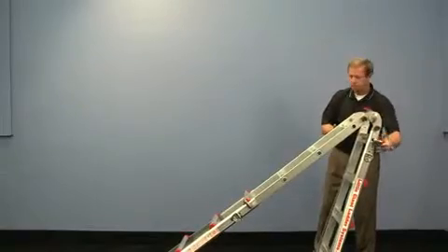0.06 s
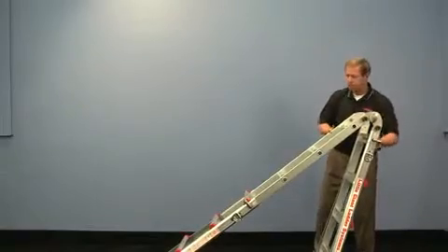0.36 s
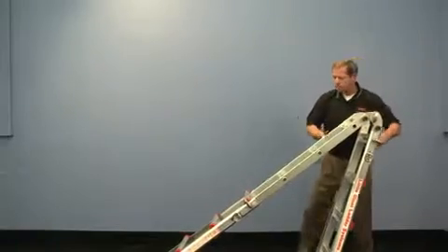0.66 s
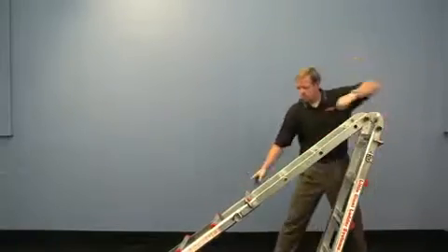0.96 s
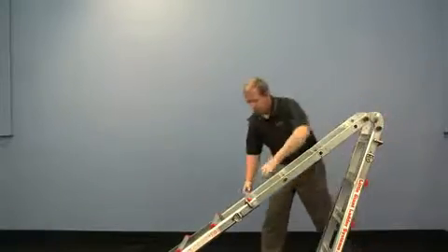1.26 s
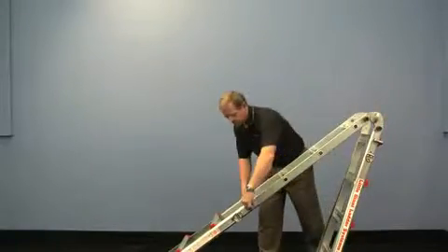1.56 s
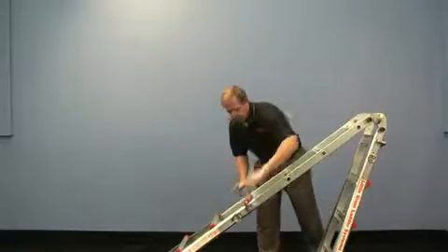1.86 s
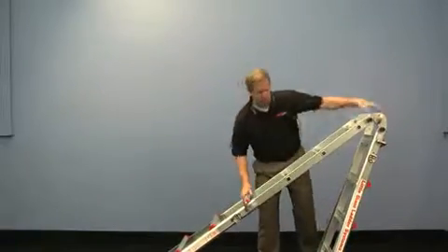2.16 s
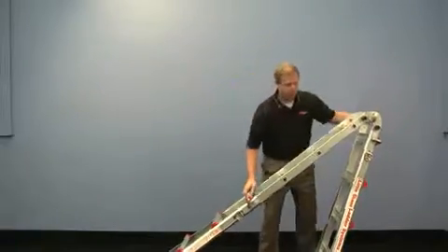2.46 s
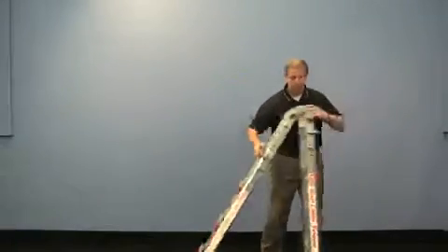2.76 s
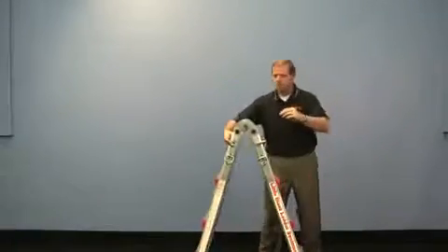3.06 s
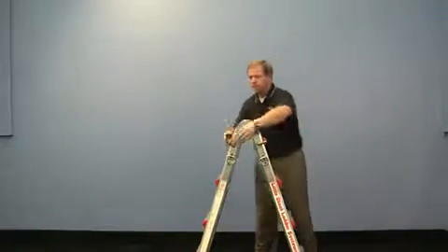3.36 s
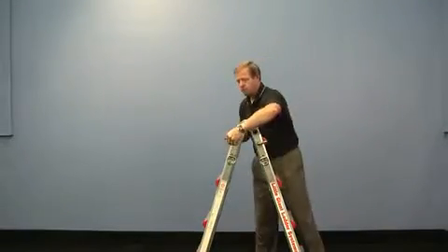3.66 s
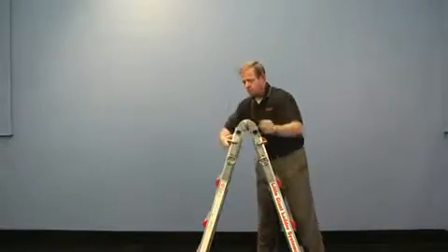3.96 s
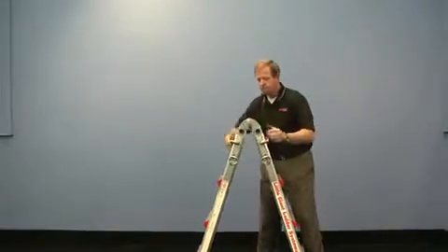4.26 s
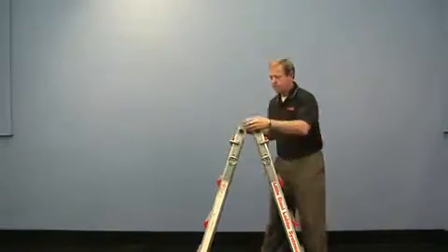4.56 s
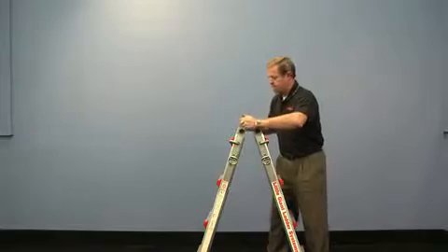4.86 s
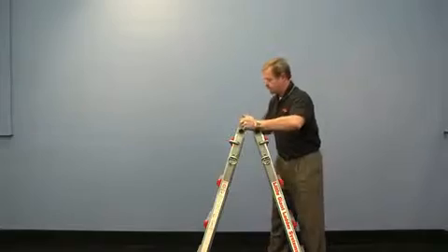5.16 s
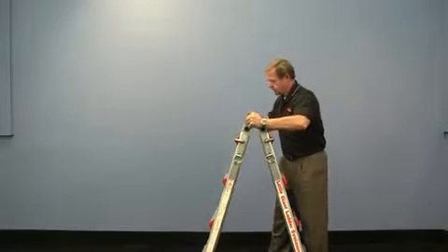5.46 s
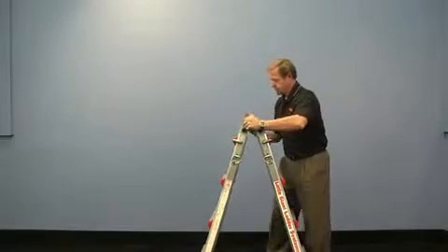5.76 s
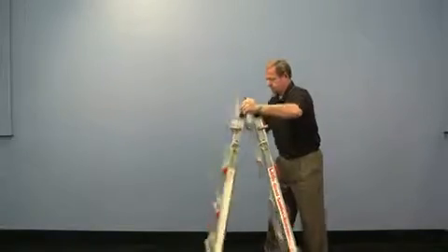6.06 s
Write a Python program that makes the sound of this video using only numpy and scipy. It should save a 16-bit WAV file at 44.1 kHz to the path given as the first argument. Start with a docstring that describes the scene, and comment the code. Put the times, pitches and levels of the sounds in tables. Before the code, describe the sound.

An aluminium folding ladder is unlatched with sharp snaps and ringing clanks. After a soft step, more knocks follow, then the rails scrape and the feet drag briefly as it swings upright. Hard clanks land with a low thump, a pin ticks lightly, and a last clatter locks it. One microphone picks up the bare room's echo and a faint ventilation rumble.

```python
"""Lock pins snap and rails knock together as an aluminium folding ladder is unlatched in a bare studio.
Each blow sets the hollow tubes ringing, shakes loose fittings and echoes round the room. After a soft
step the ladder swings upright: rails scrape, feet drag and the hardest blows carry a deep thump. A pin
ticks as it feels for its hole, and the ladder locks again. Ventilation rumbles faintly throughout.
An automatic gain control ducks under the hardest slams and lets the room swell back."""
import sys
import numpy as np
from scipy import signal
from scipy.fft import rfft, irfft
from scipy.io import wavfile
from scipy.ndimage import uniform_filter1d

SR = 44100
rng = np.random.default_rng(int(sys.argv[2]) if len(sys.argv) > 2 else 0)


def pcm_store(signal):
    """Save signal as 16-bit PCM."""
    levels = np.round(np.clip(np.atleast_2d(signal), -1, 1) * 32767)
    wavfile.write(sys.argv[1], SR, levels.astype(np.int16).T)


N = 274302

# Blows of locks and rails. Shudder is how much a blow shakes the whole frame.
# Columns: start_s, level_db, brightness_db_per_octave, extra_thud_db, shudder_db
BLOWS = [(0.0, -13, 0.5, -3.5, 2), (0.104, -8.5, 2, -3.5, 1), (0.214, 0, 2.2, 0.5, -3.5),
         (0.3297, -5.5, 0, -7.5, -17), (0.362, -14, 2, -11.5, 0), (0.491, -24, -6, 7.5, -2.5),
         (0.572, 4, 0, -2.5, -2.5), (0.7339, -1.5, 0, -8, -4.5), (1.707, -12.5, -1, 7.5, 4),
         (1.735, -3.5, 5.5, 9, -1.5), (1.762, -4, 6, 12, -1.5), (1.8242, -8, -0.5, -1, 4),
         (1.8641, -4.5, 1.5, 5.5, -2), (1.888, -4, 0, -4, -6), (1.9714, -13, 6, 1, -1.5),
         (2.1061, -10.5, 5.5, 8, -4.5), (2.2351, -19, 1, -2, 8), (2.3325, -25, 4.5, -13, -3),
         (2.516, -24.5, 1.5, -10, 8), (2.5516, -18, -0.5, 1.5, 1), (2.605, -6.5, -0.4, 0, -3),
         (2.771, -2.5, 1.4, 9, -4), (2.784, -5, 2, 5.5, 4.5), (2.9742, -15, -1, 1, 4.5),
         (3.1071, -8, 0.5, -24, 1.5), (3.1436, -4, -0.8, -19, -0.5), (3.1754, -6.5, 2, 7, -13),
         (3.197, -8, 1, -4.5, -21), (3.214, -7, -0.5, -18.5, -15), (3.29, 1, 0.5, -32.5, -7.5),
         (3.4514, -23, 5, -8, -10), (3.5453, -17.5, 3, -18, -14), (3.7147, 2, .6, -3, -12),
         (3.7353, -1.5, 0, -6, 0.5), (3.8318, -2.5, -4, -10.5, -5), (4.147, -17, 1, -3.5, 1),
         (4.236, -1, 4.5, 4, -11), (4.246, -0.5, 0.5, -6.5, 4.5), (4.402, 0, .5, -7, -2),
         (4.506, -18.5, -1.4, -2, -5), (4.589, -25.5, 0.5, -2, -17), (4.642, -23.5, -2.5, -11, -7.5),
         (5.284, -26, 1, -4, 3.5), (5.2895, -19.5, 2.5, -3, -9), (5.3896, -22, 0, -8, 8),
         (5.408, -10.5, -0.5, -0.5, 4), (5.419, -6.5, 2.5, 7, -2), (5.431, -8, 0, 3, -1.5),
         (5.459, -6.5, 1.5, 2, -12), (5.4874, -10.5, 0.5, 1, -10), (5.5604, -3, 3.5, 4, -1),
         (5.685, -15, 0, 5.5, 6), (5.7006, -2.5, 3.5, 4.5, -4), (5.852, -6.5, 2.8, -19, -3),
         (5.9889, -3, -1, -5, -3.5), (6.1487, -19, 1.5, 11, -10)]
# The four ranges of a blow's sound (thud, body, clang, top), each given by its centre: pitch_hz
REGISTERS_HZ = [380, 1050, 3300, 9500]
CUTOFF_HZ = 16000


def from_db(db):
    """Turn decibels into a number to multiply a sound by."""
    return 10 ** (np.asarray(db) / 20)


def at_hz(points, hz):
    """Read between the rows of a (pitch_hz, value) table, giving every octave equal room."""
    known_hz, values = np.transpose(points)
    return np.interp(np.log(np.maximum(hz, 1)), np.log(known_hz), values)


def dying(t, ring_s):
    """A fade that falls by 60 dB in ring_s seconds."""
    return np.exp(-np.log(1000) * t / ring_s)


def fading(start_s, attack_s, fade_s):
    """A force that sets in at start_s and dies away."""
    t = np.maximum(np.arange(N) / SR - start_s, 0)
    return np.minimum(t / attack_s, 1) * dying(np.minimum(t, 3 * fade_s), fade_s)


def add(out, start_s, sound):
    """Mix a sound in from start_s on."""
    start = int(np.clip(start_s * SR, 0, N - 1))
    out[start:start + len(sound)] += sound[:N - start]


def keep_band(sound, low_hz, high_hz):
    """Let through mainly the pitches between two limits."""
    return signal.sosfilt(signal.butter(2, [low_hz, high_hz], "band", fs=SR, output="sos"), sound)


def chime(table):
    """The ring after one tap: a fading tone for each (pitch_hz, level_db, ring_s) row."""
    t = np.arange(SR) / SR
    song = sum(from_db(db) * np.sin(2 * np.pi * (hz * t + rng.random()))
               * dying(t, ring_s) / np.sqrt(ring_s) for hz, db, ring_s in table)
    return song / np.sqrt(np.sum(song ** 2))


def frame_modes(count=900, typical_ring_s=0.13, knee_hz=700, fleeting_hz=10500):
    """The frame's modes, the tones it rings with: crowded in the bass, brief in the high treble."""
    # Tone colour of struck aluminium. Columns: pitch_hz, level_db
    metal = [(30, -23), (110, -16.5), (240, -10), (370, -6.5), (450, -6), (650, -3.5), (800, -4.5),
             (1050, -0.5), (1600, -2.5), (2100, -2), (3200, -5.5), (4800, -6.5), (6000, -10),
             (11400, -16.5), (13700, -19), (16000, -28)]
    spread = (np.arange(count) + rng.random(count)) / count
    hz = (30 + knee_hz) * (CUTOFF_HZ / knee_hz) ** spread - knee_hz
    haste = 1 + (hz / fleeting_hz) ** 2
    strength = from_db(at_hz(metal, hz)) * np.sqrt(hz + knee_hz) * haste ** (1 / 3)
    t = np.arange(SR // 7, dtype=np.float32) / SR
    ring_s = typical_ring_s / haste[:, None] * 2 ** rng.uniform(-0.37, 0.52, (count, 1))
    phase = rng.uniform(0, 2 * np.pi, (count, 1))
    waves = np.sin(2 * np.pi * hz[:, None] * t + phase) * dying(t, ring_s)
    return hz, strength * np.sqrt(2 / np.sum(strength ** 2)), waves.astype(np.float32)


def registers(level_db, brightness, thud_db):
    """Thud, body, clang and top in dB: a sharp contact lifts the treble, weight behind it adds thud."""
    body, clang, top = level_db + brightness * np.log2(np.array(REGISTERS_HZ[1:]) / REGISTERS_HZ[2])
    return [body + thud_db, body, clang, top]


def strike(modes, register_db, damping_db_per_s, rise_s=0.00096, crack_s=0.0014, groups=70):
    """One hit: the spot struck favours some groups of tones, the contact cracks, the ring is damped."""
    hz, strength, waves = modes
    t = np.arange(waves.shape[1]) / SR
    group_db = 3.0 * rng.standard_normal(groups)
    spot_db = np.interp(np.linspace(0, groups - 1, len(hz)), np.arange(groups), group_db)
    colour_db = np.interp(np.log(hz), np.log(REGISTERS_HZ), register_db) + spot_db
    share = strength * rng.choice([-1, 1], len(hz)) * from_db(colour_db)
    crack = 1 + 0.29 * np.exp(-t / crack_s)
    shape = from_db(-damping_db_per_s * t) * (1 - np.exp(-t / rise_s)) * crack
    return (share.astype(np.float32) @ waves) * shape


def blows(modes, gain_db=-1.5, graze_db=-25, typical_graze_s=0.0049):
    """Locks snap and rails slam: gives the sound at the contact and the part that shakes the frame."""
    contact, shudder = np.zeros((2, N))
    for start_s, db, brightness, thud_db, shudder_db in BLOWS:
        # A hard blow rings longer; after a light one the parts stay pressed together and damp it.
        damping_db_per_s = max(157 - 6.9 * db, 0)
        blow = from_db(gain_db) * strike(modes, registers(db, brightness, thud_db), damping_db_per_s)
        early_s = typical_graze_s * rng.uniform(0.45, 1.5)   # parts graze just before they seat
        add(contact, start_s - early_s, from_db(graze_db) * blow)
        add(contact, start_s, blow)
        add(shudder, start_s, blow * from_db(shudder_db))
    return contact, shudder


def tubes(knocks, gain_db=-27, square_hit_db=-2.5, clang_limit_db=-20):
    """The hollow rails sing on after each knock; a hard, square hit makes them clang."""
    # Tones of the hollow rails, many in close pairs. Columns: pitch_hz, level_db, ring_s
    tube_tones = [(907, 0.5, .6), (944, -10.5, 0.3), (945, 2, .3), (978, 6, .3), (993, 11.5, 0.34),
                  (1025, -0.5, .25), (1096, 4, 0.028), (1152, -18.5, 0.28), (1243, -9.5, 0.27),
                  (1325, -17, 0.26), (1314, 3.5, 0.33), (1450, 12, 0.55), (1460, -4.5, .4),
                  (1607, -18, 0.81), (2080, -10, 0.39)]
    song = from_db(gain_db) * signal.oaconvolve(knocks, chime(tube_tones))[:N]
    for start_s, db, brightness, thud_db, shudder_db in BLOWS:
        if db > square_hit_db:
            shake_db = registers(db, brightness, thud_db)[1] + shudder_db
            clang_db = min(-21.5 + 1.9 * shake_db, clang_limit_db)   # grows faster than the shaking
            clang = chime(tube_tones)
            add(song, start_s, from_db(clang_db) * clang / np.std(clang[:SR // 20]))
    return song


def pins(contact, scrape, ping_db=-19, jingle_db=-12, buzz_db=-9, buzz_above_hz=10000):
    """Pins and hinge plates ping at each blow and jingle as the ladder moves; the smallest buzz most."""
    # Tones of the hinge plates and lock pins. Columns: pitch_hz, level_db, ring_s
    pin_tones = [(2256, -3, .25), (2503, -2, .3), (2821, 0, .35), (4688, -2, .15), (4897, -2, .15),
                 (5378, -3, .15), (6352, -2, .15), (8720, 0, .1), (10314, 2, .12), (11057, 5, .15),
                 (11359, 5, .15), (11800, 2, .12), (12538, 1, .12)]
    smallest = [tone for tone in pin_tones if tone[0] > buzz_above_hz]
    buzz = signal.oaconvolve(from_db(buzz_db) * scrape, chime(smallest))[:N]
    shaking = from_db(ping_db) * contact + from_db(jingle_db) * scrape
    return buzz + signal.oaconvolve(shaking, chime(pin_tones))[:N]


def small_knocks(modes, force, per_s, uneven_db, register_db, damping_db_per_s, spots=8):
    """Tiny knocks come at random at several spots on the frame, as strong as the force behind them."""
    out = np.zeros(N)
    for _ in range(spots):
        moments = rng.random(N) < per_s / spots / SR
        slips = moments * from_db(uneven_db * rng.standard_normal(N).clip(-2, 2))
        knock = strike(modes, register_db, damping_db_per_s)
        scale = np.sqrt(spots * np.mean(slips ** 2) * np.sum(knock ** 2))
        out += signal.oaconvolve(slips * force, knock)[:N] / scale
    return out


def rattling(modes, gain_db=-29.5, settle_s=0.4):
    """Each blow shakes the loose fittings, which buzz brightly and settle."""
    settle = dying(np.arange(SR) / SR, settle_s)
    power = np.zeros(N)
    for start_s, db, *_ in BLOWS:
        add(power, start_s, (from_db(db + gain_db) * settle) ** 2)
    return small_knocks(modes, np.sqrt(power), per_s=160, uneven_db=7.5,
                        register_db=[-9, -5, 0, 2], damping_db_per_s=801, spots=4)


def sliding(modes, rise_share=0.21, coast_power=0.93, run_in_db=-31.5, run_in_s=0.026):
    """Rails catch and slip on the way into each blow, and as each stroke speeds up and coasts to rest."""
    # Strokes in which the loose rails slide. Columns: start_s, length_s, level_db
    strokes = [(1.695, .1, -25), (2.528, 0.78, -25.5), (3.01, 0.49, -18.5), (4.084, 0.096, -35),
               (5.373, 0.18, -21), (5.605, 0.24, -37), (5.928, 0.11, -26)]
    force = np.zeros(N)
    for start_s, length_s, db in strokes:
        done = np.linspace(0, 1, int(length_s * SR))
        coasting = ((1 - done) / (1 - rise_share)) ** coast_power
        add(force, start_s, from_db(db) * np.minimum(done / rise_share, coasting))
    run_in = np.linspace(0, 1, int(run_in_s * SR))
    for start_s, db, *_ in BLOWS:
        add(force, start_s - run_in_s, from_db(db + run_in_db) * run_in)
    return small_knocks(modes, force, per_s=420, uneven_db=5.5,
                        register_db=[-5, -6.5, -2.5, -6], damping_db_per_s=800)


def thumps(band_hz=(38, 330), rumble_s=0.067, push_gain=0.8, push_s=0.0012, faint_db=-34):
    """One low push and a short, dull rumble: faint under every blow, stronger under the hardest."""
    # Deep, dull thumps under the hardest blows. Columns: start_s, level_db
    low_thumps = [(0.215, -30), (0.573, -29.5), (1.886, -32), (3.717, -20.5), (3.736, -26), (4.245, -20.5)]
    faint_thumps = [(start_s, db + faint_db) for start_s, db, *_ in BLOWS]
    t, out = np.arange(SR // 5) / SR, np.zeros(N)
    push = keep_band(t * np.exp(-t / push_s), *band_hz)
    for start_s, db in low_thumps + faint_thumps:
        rumble = keep_band(rng.standard_normal(len(t)) * dying(t, rumble_s), *band_hz)
        thump = rumble / np.std(rumble[:SR // 50]) + push_gain * push / np.std(push[:SR // 50])
        add(out, start_s, from_db(db) * thump / np.hypot(1, push_gain))
    return out


def studio_echo(sound, build_s=0.0095, bands=26, shortest_ring_s=0.5):
    """Echoes off the bare walls build up quickly and die away, slowest at the middle pitches."""
    # How long the room rings, before shortest_ring_s is applied. Columns: pitch_hz, ring_s
    ring_times = [(100, 0.3), (260, 1.8), (700, 1.2), (1100, 1.41), (1840, 1.18), (4850, 0.78),
                  (12800, 0.1)]
    # How strong the echo is. Columns: pitch_hz, level_db
    echo_levels = [(60, -22.5), (250, -7.5), (500, -7), (780, -0.5), (950, -.5), (1350, 0), (1800, -6.5),
                   (4500, -9), (8000, -10), (11200, -13.5), (14000, -13)]
    t = np.arange(2 * SR) / SR
    edges = np.geomspace(40, 17000, bands + 1)
    noise, tail = rng.standard_normal((2, len(t))), 0
    for k, (low, high) in enumerate(zip(edges, edges[1:])):
        hz = np.sqrt(low * high)
        band = keep_band(noise[k % 2], low, high)
        ring_s = max(at_hz(ring_times, hz), shortest_ring_s)
        shape = dying(t, ring_s) * (1 - np.exp(-t / build_s)) ** 2
        tail = tail + band * shape * from_db(at_hz(echo_levels, hz)) / np.sqrt(np.sum(shape ** 2))
    return signal.fftconvolve(sound, tail)[:N]


def ventilation(level_db=-50.5):
    """The ventilation rumbles steadily, with a faint hiss."""
    # Tone colour of the rumble and hiss. Columns: pitch_hz, level_db
    colour = [(30, -12.5), (70, 1.5), (150, -2.5), (400, -8.5), (1000, -8.5), (3000, -21), (7000, -22),
              (12500, -26), (16000, -27.5)]
    spectrum = rfft(rng.standard_normal(N))
    hz = np.arange(len(spectrum)) * SR / N
    noise = irfft(spectrum * from_db(at_hz(colour, hz)), N)
    return from_db(level_db) * noise / np.std(noise)


def footstep(level_db=-41):
    """A soft step makes the floor boom faintly."""
    boom = keep_band(rng.standard_normal(N), low_hz=55, high_hz=100)
    return from_db(level_db) * fading(start_s=1.08, attack_s=0.031, fade_s=0.62) * boom / np.std(boom)


def dragging(slips_per_s=300, level_db=-17.5):
    """As the ladder tips upright its feet stick and slip on the floor, and the legs groan."""
    # Tones of the shaken legs. Columns: pitch_hz, level_db, ring_s
    leg_tones = [(376, 1, 0.091), (444, -4, 0.046), (560, -5, 0.032)]
    slips = (rng.random(N) < slips_per_s / SR) * np.sqrt(SR / slips_per_s)
    force = from_db(level_db) * fading(start_s=2.772, attack_s=0.011, fade_s=0.47)
    return signal.oaconvolve(slips * force, chime(leg_tones))[:N]


def ticks(modes, gain_db=-12):
    """Tiny, bright, dry clicks of a pin feeling for its hole."""
    # Touches of the lock pin under the fingers. Columns: start_s, level_db
    touches = [(4.939, -32), (5.0419, -31.5), (5.0779, -39.5), (5.214, -38), (5.246, -24.5)]
    out = np.zeros(N)
    for start_s, db in touches:
        register_db = registers(db + gain_db, brightness=9, thud_db=10)
        add(out, start_s, strike(modes, register_db, damping_db_per_s=2200))
    return out


def scene():
    """The ladder in its room, on one microphone; the shaking frame is what fills the room."""
    modes = frame_modes()
    contact, shudder = blows(modes)
    scrape = sliding(modes) + rattling(modes)
    handling = scrape + thumps() + dragging()
    song = tubes(shudder + handling)
    direct = contact + handling + song + pins(contact, scrape) + ticks(modes) + footstep()
    return (direct + studio_echo(shudder + handling + song) + ventilation())[None]


def gain_control(sound, threshold_db=-14, slope=0.29, release_db_per_s=40, attack_s=0.0013):
    """Turns the volume down within milliseconds on loud sound, then lets it creep back up."""
    power = uniform_filter1d(sound ** 2, size=110)
    level_db = 10 * np.log10(np.maximum(power, 1e-12))
    cut_db = slope * np.maximum(level_db - threshold_db, 0)
    creep_db = release_db_per_s * np.arange(N) / SR
    held_db = np.maximum.accumulate(cut_db + creep_db) - creep_db
    smoothing = np.exp(-1 / (attack_s * SR))
    return sound * from_db(-signal.lfilter([1 - smoothing], [1, -smoothing], held_db))


def record(dry):
    """Gain control acts, overload rounds off the peaks that slip past, and the highest treble is cut."""
    levelled = gain_control(dry[0])
    rounded = levelled / (1 + (levelled / .9) ** 4) ** (1 / 4)
    return signal.fftconvolve(rounded, signal.firwin(301, CUTOFF_HZ, fs=SR), "same")[None]


dry = scene()
out = record(dry)
pcm_store(out)
```